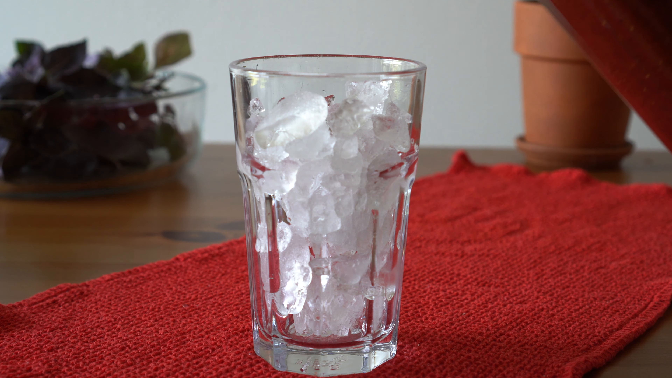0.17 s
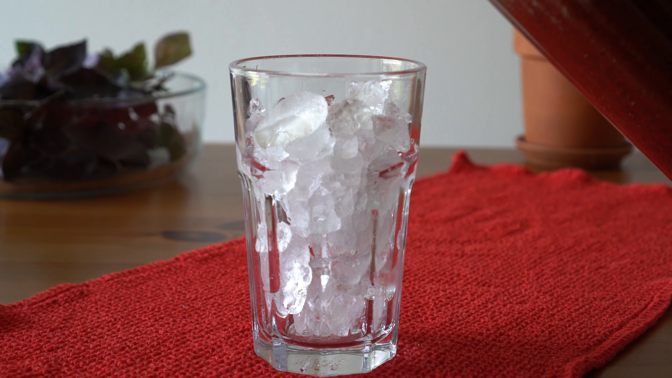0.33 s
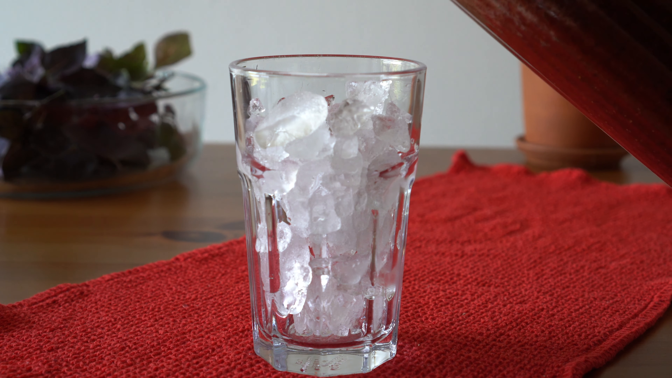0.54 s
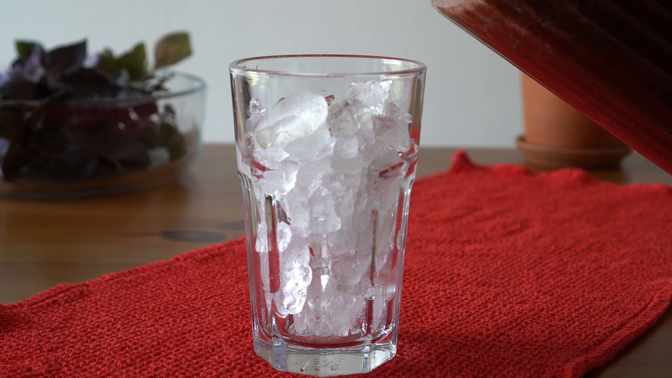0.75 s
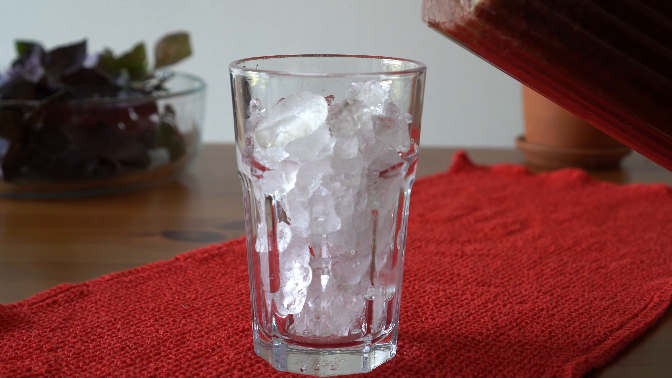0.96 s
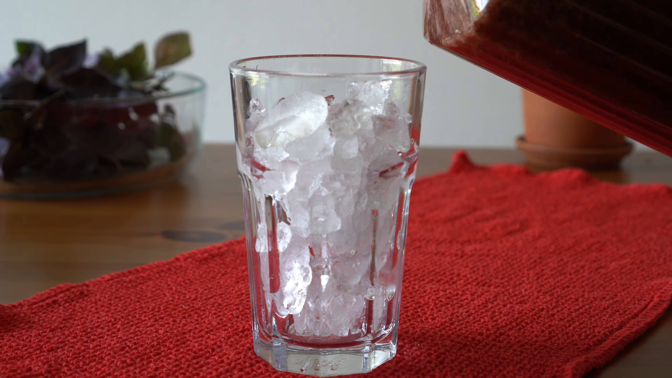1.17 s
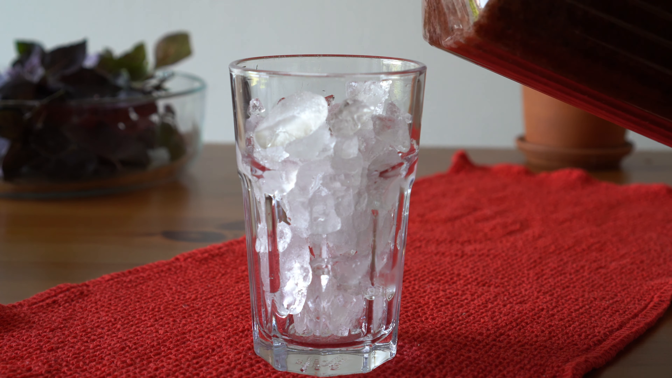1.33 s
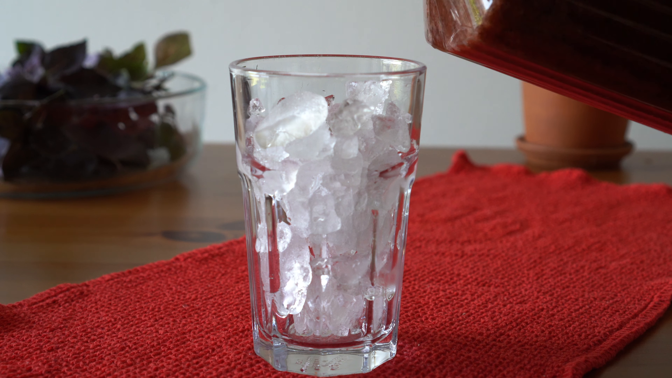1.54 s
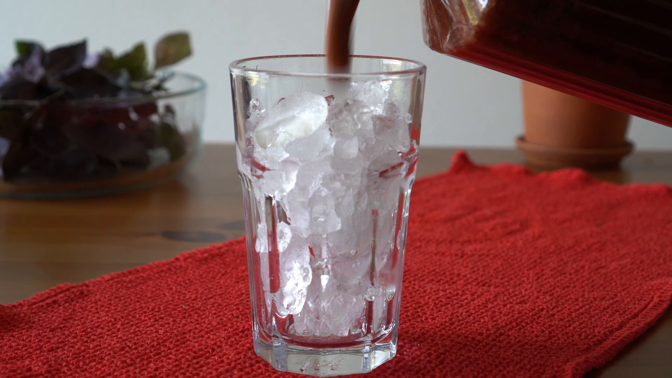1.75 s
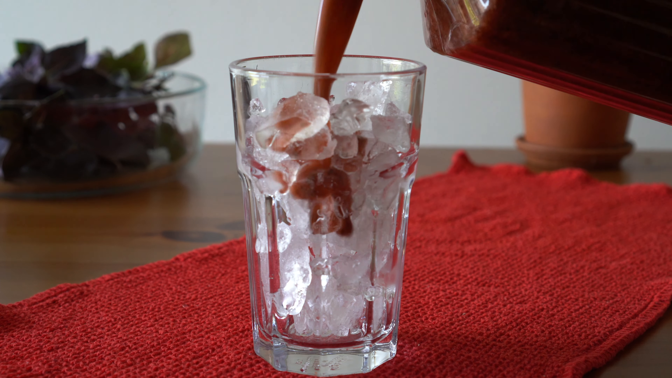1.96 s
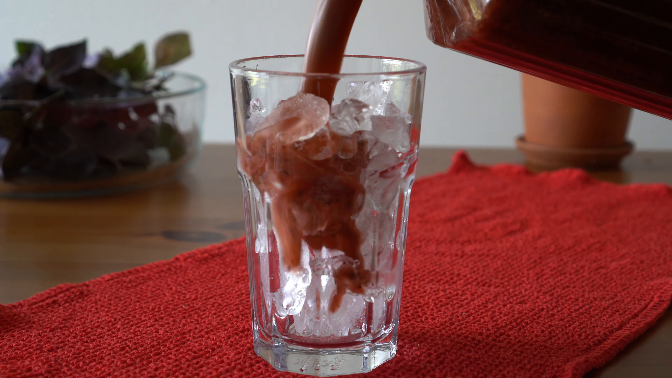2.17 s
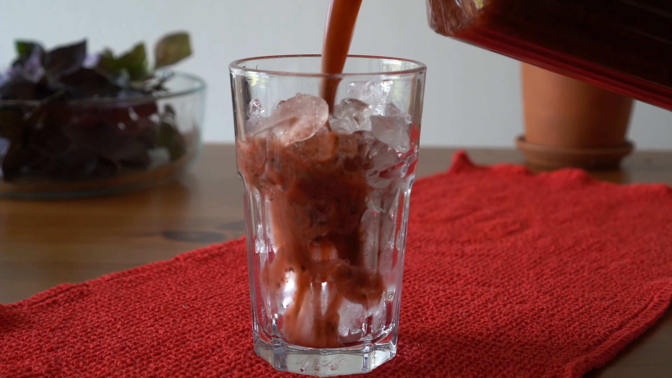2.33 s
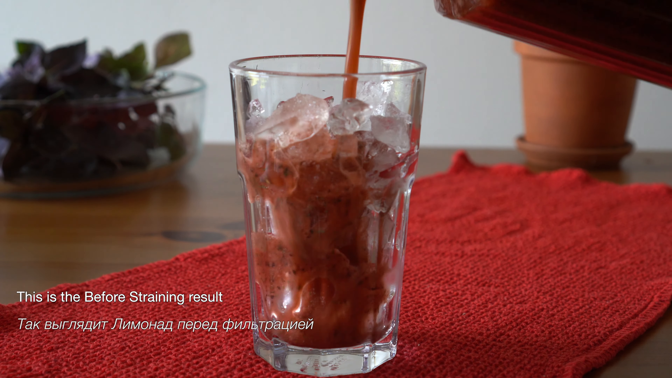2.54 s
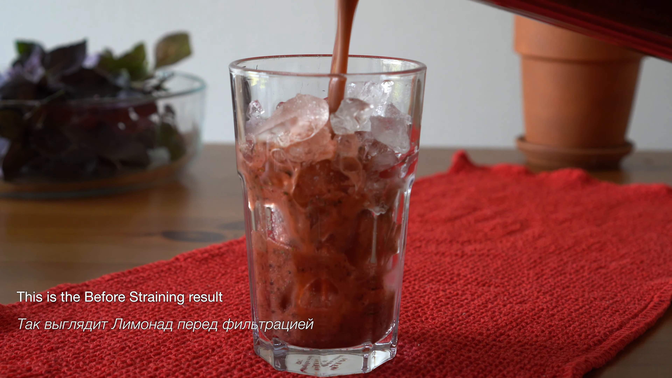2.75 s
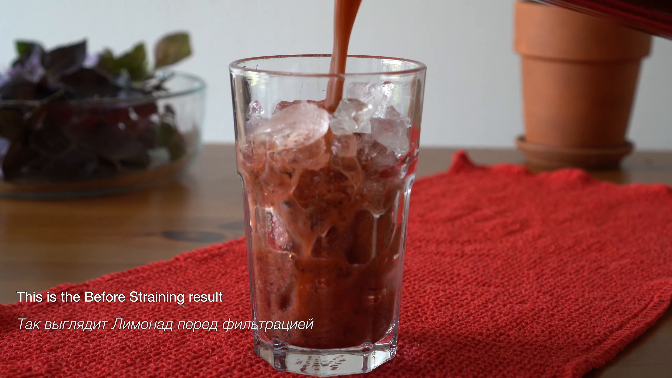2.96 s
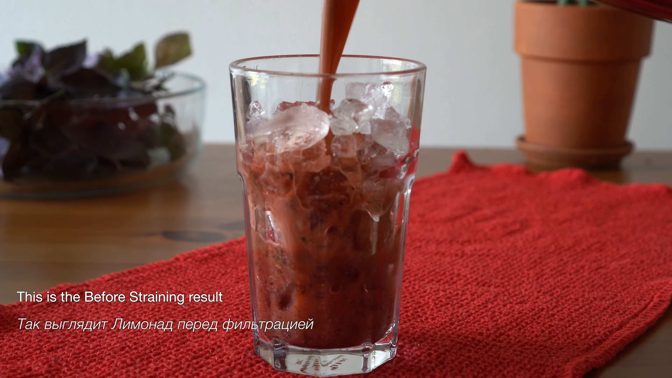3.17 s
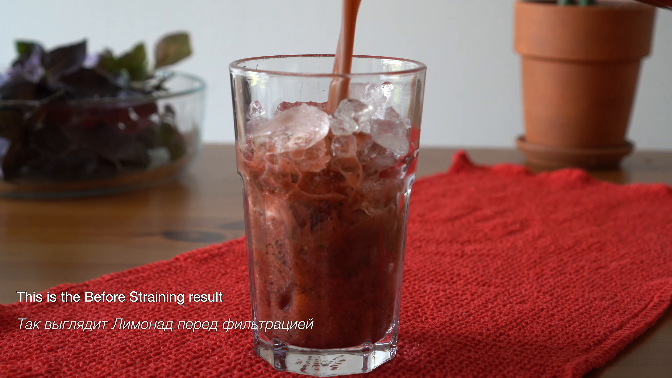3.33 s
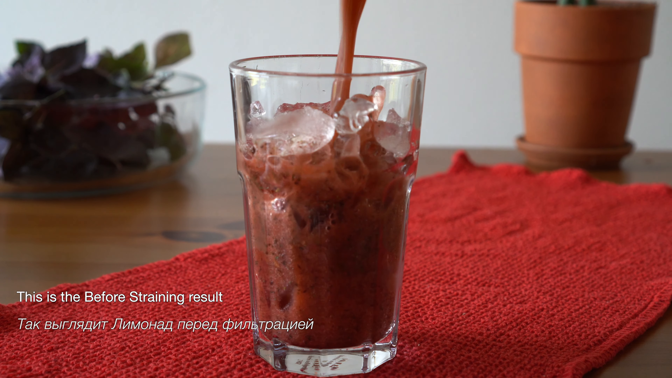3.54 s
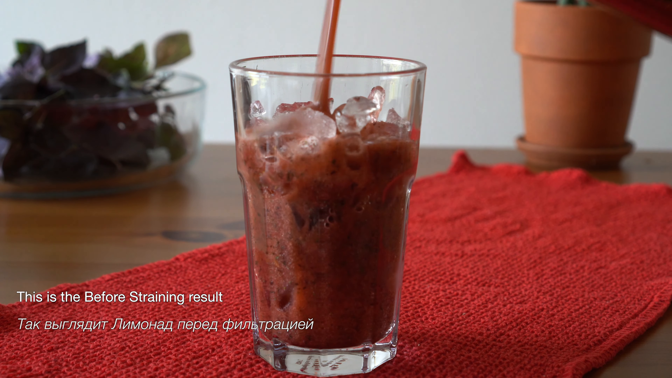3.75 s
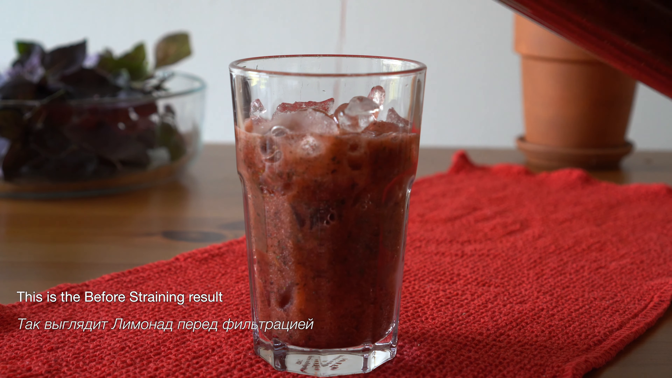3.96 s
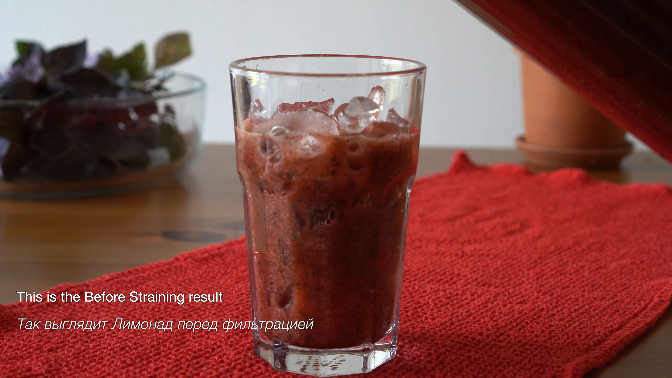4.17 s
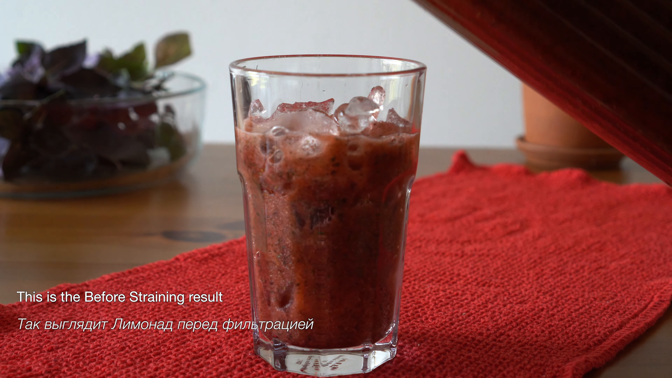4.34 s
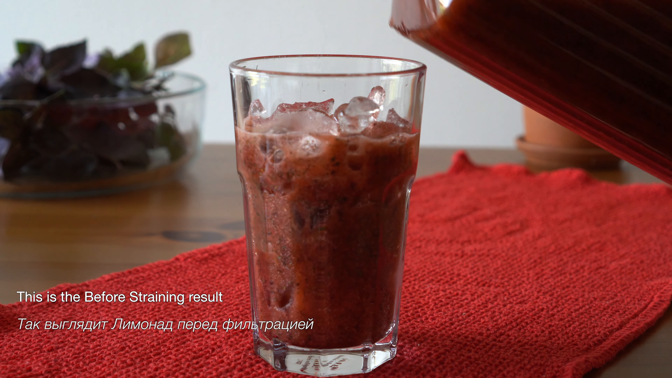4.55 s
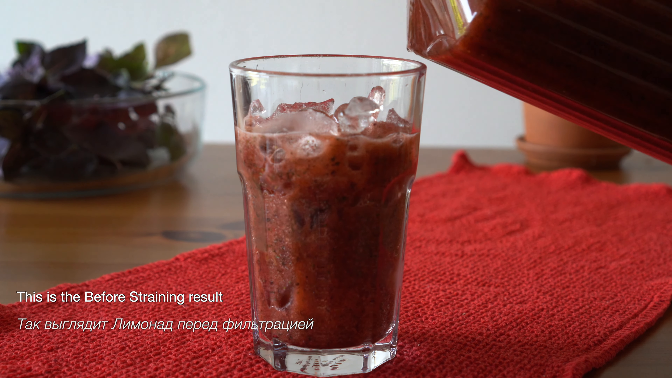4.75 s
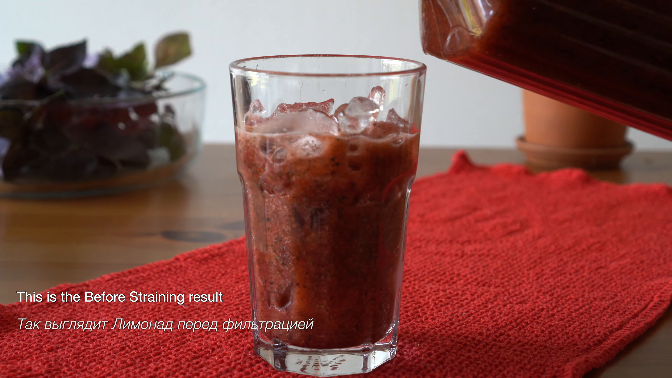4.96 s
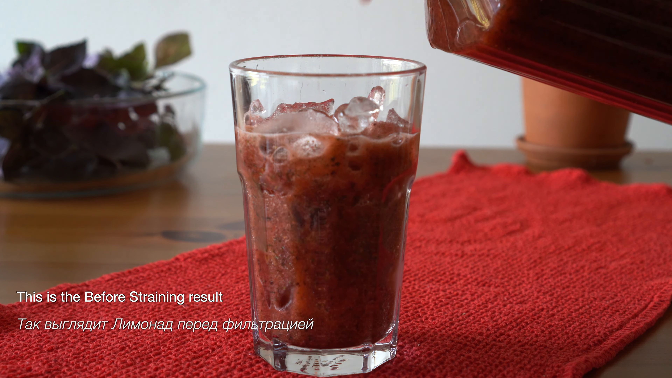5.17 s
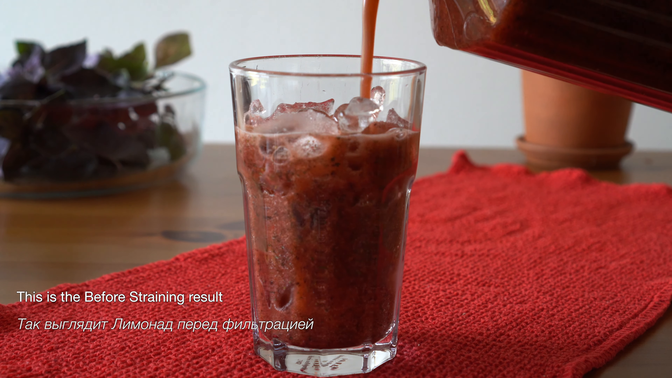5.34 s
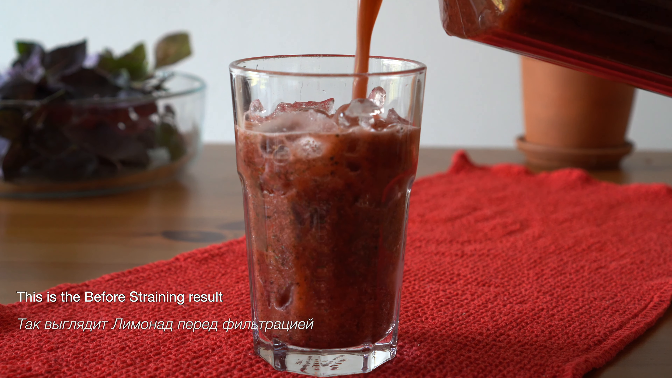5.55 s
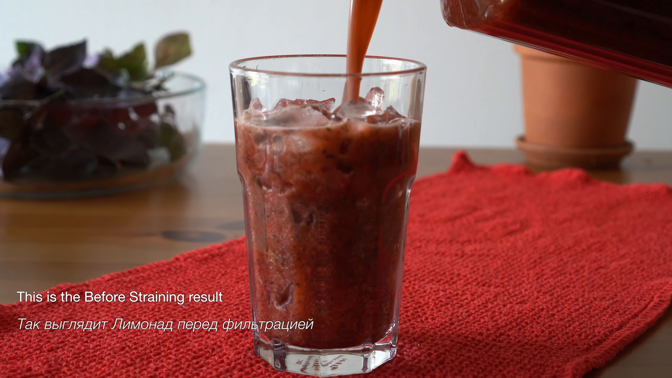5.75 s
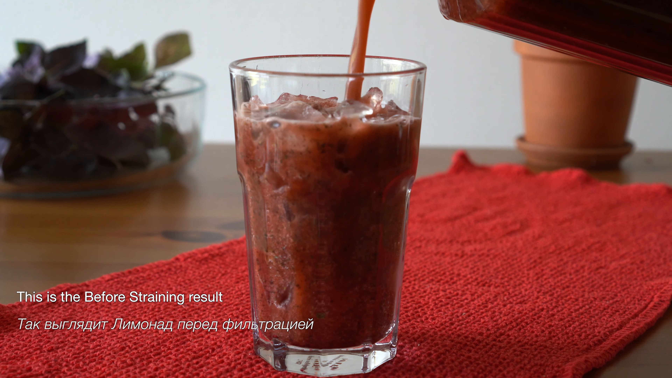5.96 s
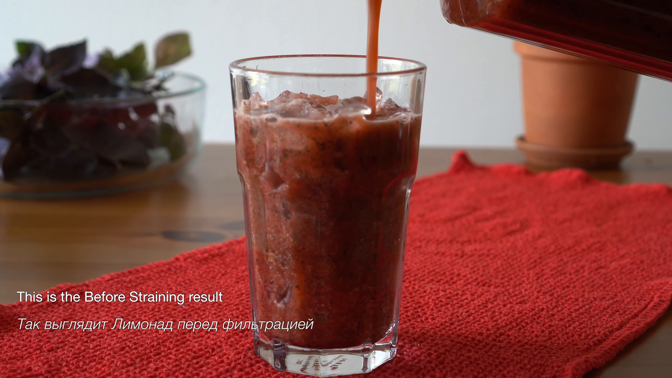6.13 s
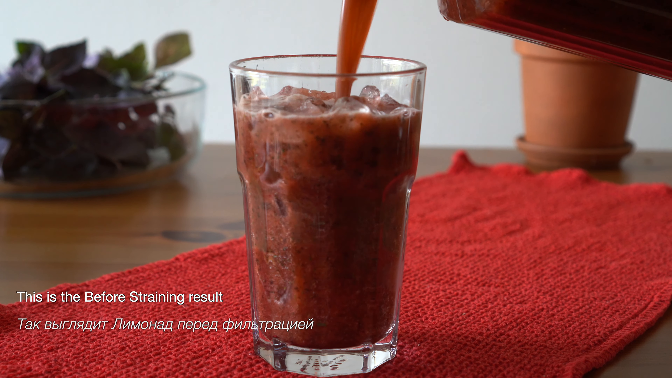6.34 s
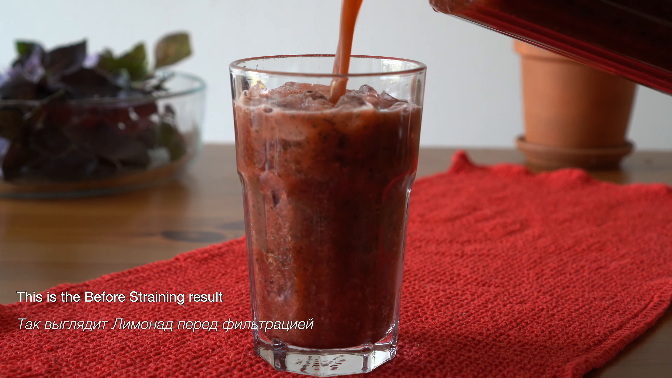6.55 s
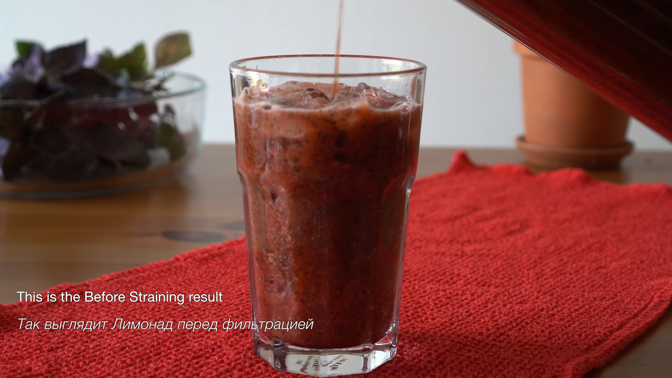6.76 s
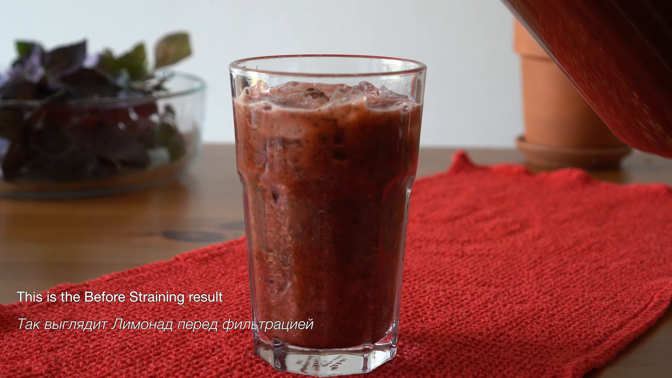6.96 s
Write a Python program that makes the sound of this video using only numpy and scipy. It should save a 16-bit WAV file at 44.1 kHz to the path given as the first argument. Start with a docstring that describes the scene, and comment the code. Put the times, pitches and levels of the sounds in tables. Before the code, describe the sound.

A quiet kitchen with low rumble and faint fan air; the tail of an earlier knock fades, then a soft deep thud. Thick drink pours onto crushed ice in a glass: sharp cracks, wet clacks, glugs and a dense rattle growing loudest around the middle. It dies away to near silence, then a second, much softer pour brings a few clacks and dull glugs. Close microphone, light room reverberation.

```python
"""Thick drink over crushed ice

In a quiet kitchen a thick drink is poured twice over crushed ice in a glass on a padded table.
Ice pieces clack as ringing pairs, crack in spits of bright noise and rattle as grains in resonators.
Trapped air glugs and gurgles; the glass and table knock dully, as damped sines.
Shaped noise makes the fan far off and the building's rumble; one mono microphone hears it with the room."""
import sys
import numpy as np
from scipy import signal
from scipy.fft import rfft, irfft
from scipy.io import wavfile

SR = 44100
rng = np.random.default_rng(int(sys.argv[2]) if len(sys.argv) > 2 else 0)


def wav_record(signal):
    """Record a signal, one row per channel, as 16-bit PCM in the file named by sys.argv[1]."""
    frames = np.transpose(np.atleast_2d(signal))
    bounded = np.clip(frames, -1, 1)
    # unit amplitude maps onto the largest positive 16-bit level
    quanta = np.round(bounded * 32767).astype(np.int16)
    wavfile.write(sys.argv[1], SR, quanta)


N = 308679

# Room air with the fan's broad whines, relative power density: f/Hz, level/dB
AIR = [(88, -35), (150, -2.5), (201, -4.5), (302, -7.5), (346, -15), (381, -9), (540, -15.5), (948, -15.5),
       (1090, -6), (1170, -17), (1600, -11), (2230, -26), (2410, -18), (2650, -27.5), (15500, -43.5)]
AIR_DB = -64   # rms of the air at the microphone
# Rumble of the building: t/s, level/dB
RUMBLE = [(0, -50), (0.9, -53), (1.15, -44.5), (1.9, -51.5), (3.2, -54.5), (4.3, -55), (5.6, -53.5),
          (7.0, -51)]
# Jolts that make the table boom: t/s, level/dB
JOLTS = [(0, -54), (2.0, -52.5), (2.28, -49), (3.02, -47), (3.55, -44), (6.28, -63.5), (6.92, -53)]
BOOM_DB, BOOM_FALL_DB_PER_S = -65.5, 63.5   # low hum of the table at rest; how a jolt dies away
# Decay of the kitchen's reverberation: f/Hz, t60/s
ROOM = [(150, 0.056), (400, 0.43), (1000, 0.32), (2500, 0.49), (6000, 0.35), (9000, 0.42), (13000, 0.22)]
ROOM_DB, ROOM_DELAY_S = -7.5, 0.002
KNOCK_ROOM_DB = 7   # the knocks and the hollow hum send this much more into the room

# Dull knocks of the glass and of the table under it: t/s, level/dB, f/Hz
KNOCKS = [(0.975, -34, 33.2), (1.995, -38.5, 566), (2.001, -41.5, 261), (2.244, -38.5, 485),
          (2.94, -30, 553), (3.003, -38.5, 92), (3.647, -38.5, 408), (4.125, -35, 406.4),
          (4.129, -50.5, 265), (6.813, -49, 397), (6.849, -45, 235), (6.87, -42.5, 425.5)]
# An earlier knock still dying at the start: f/Hz, level/dB, t60/s
EARLIER_KNOCK = [(136.6, -44.5, 0.34), (218.6, -50.5, 0.37), (383, -53, 0.081), (655, -45.5, 0.0078)]
KNOCK_T60_S, KNOCK_T60_SLOPE = 0.12, 0.42   # ring at 400 Hz; lower knocks ring longer by this power of pitch
# Hum of the air in the glass under the first pour: t/s, f/Hz, level/dB
HOLLOW = [(1.84, 620, -64), (1.95, 598, -82), (2.0, 571, -50.5), (2.12, 580.5, -56), (2.22, 593, -66),
          (2.25, 460, -80), (2.56, 451, -77), (2.92, 530, -70), (3.0, 564.4, -41.5), (3.15, 571, -45),
          (3.25, 590, -89)]
HOLLOW_HALF_WIDTH_HZ = 18

# Air glugging out of the gaps: t/s, level/dB, f/Hz
GLUGS = [(1.962, -46, 570), (2.441, -43, 470), (2.592, -42, 450), (2.651, -34.5, 451), (2.74, -39.5, 530),
         (2.779, -29.5, 496), (2.788, -31, 527), (2.83, -40, 508), (5.79, -49, 419), (6.464, -38.5, 663),
         (6.892, -38.5, 425)]
GLUG_CYCLES = 18   # t60 of a glug, in cycles of its pitch
# Gurgles of the drink in a gap, sinking in pitch: t/s, length/s, first f/Hz, last f/Hz, level/dB
GURGLES = [(2.451, 0.3, 1407, 1210, -49.5), (3.161, 0.21, 900, 876, -45), (3.293, 0.14, 2750, 2447, -42),
           (4.013, 0.0697, 1700, 1472, -46), (6.82, 0.044, 2440, 2370, -63.5)]
GURGLE_HALF_WIDTH_HZ, GURGLE_FALL_DB_PER_S, PLOPS_PER_S = 150, 404, 500

# Stir of the stream under the slips, and the pitch around which the gaps favour sound as they fill:
# t/s, rattle level/dB, crackle level/dB, reference f/Hz
STREAM = [(1.848, -73, -75, 2600), (2.12, -76, -67, 2740), (2.36, -44.5, -59, 2800),
          (2.46, -53.5, -51, 1550), (2.7, -62, -79, 1390), (2.9, -44, -54.5, 1730), (3.05, -46, -60, 1850),
          (3.2, -38.5, -44, 1205), (3.3, -40.5, -50.5, 1399), (3.4, -41.5, -46.5, 1810),
          (3.66, -36, -45.5, 1975), (3.8, -45.5, -49.5, 1628), (3.97, -67, -61, 2159),
          (4.2, -92.5, -103.5, 1394), (5.75, -75.5, -74, 1527), (5.95, -91.5, -100.5, 1290),
          (6.37, -71.5, -81.5, 1700), (6.44, -63, -66, 2073), (6.6, -68.5, -72.5, 1424),
          (6.8, -76, -93.5, 2600)]
# Slips of the heap of ice: t/s of full strength, rattle level/dB, crackle level/dB, hold/s
SLIDES = [(1.855, -47, -48, 0.0036), (1.901, -50, -48, 0.0075), (1.99, -35.5, -38.5, 0.0054),
          (2.14, -40, -50, 0.026), (2.192, -40, -48.5, 0.025), (2.25, -33, -39, 0.011),
          (2.331, -57, -48.5, 0.017), (2.443, -69, -60, 0.086), (2.558, -55, -50, 0.022),
          (2.654, -49, -51, 0.011), (2.78, -37.5, -48, 0.015), (2.942, -24, -34.5, 0.0083),
          (3.013, -25, -42.5, 0.048), (3.104, -38, -43.5, 0.014), (3.305, -35, -67, 0.042),
          (3.506, -25, -29, 0.027), (3.556, -26, -34, 0.014), (3.761, -36.5, -59, 0.0089),
          (4, -49.5, -60, 0.018), (5.762, -57.5, -83.5, 0.02), (5.831, -47, -76, 0.062),
          (6.317, -63.5, -67, 0.041), (6.388, -39.5, -68, 0.005), (6.419, -38, -57, 0.015),
          (6.835, -57.5, -71.5, 0.028)]
SLIDE_RISE_DB_PER_S, RATTLE_FALL_DB_PER_S, CRACKLE_FALL_DB_PER_S = 1700, 203, 295.5
TOUCHES_PER_S, CRACKLES_PER_S = 3200, 1800
DULL_ABOVE_HZ = 3650   # wet pieces rattle little above this pitch

# Small cracks in the ice: t/s, reference level/dB (each part is set against it), f/Hz
CRACKS = [(1.8531, -19.5, 8750), (2.004, -13.5, 5300), (2.0144, -17.5, 5550), (2.145, -29.5, 7800),
          (2.248, -19, 5350), (2.414, -27.5, 7300), (2.439, -39, 8400), (2.5995, -26.5, 7100),
          (2.6677, -13.5, 5180), (2.7643, -33.5, 8050), (2.845, -23, 8500), (2.9786, -5, 4370),
          (3.0178, -7, 4370), (3.212, -12.5, 5940), (3.295, -21.5, 12960), (3.36, -12, 5540),
          (3.3705, -14.5, 8700), (3.3912, -17.5, 8150), (3.4297, -20.5, 7850), (3.5051, -8, 4500),
          (3.5177, -12, 4430), (3.536, 0, 4470), (3.638, -17.5, 5730), (3.7153, -22, 7800),
          (3.7715, -17.5, 8400), (3.792, -14, 7500), (3.833, -21, 7040), (3.8914, -17.5, 6530),
          (3.931, -23.5, 12200), (3.996, -19.5, 8470), (4.013, -14.5, 9100), (4.0302, -20, 8500),
          (4.085, -26.5, 9400), (4.16, -22.5, 6170), (4.463, -43.5, 8250), (4.757, -38, 5380),
          (5.492, -44.5, 3500), (5.547, -39, 4540), (5.673, -52.5, 8100), (5.6995, -36, 6000),
          (6.053, -47, 5000), (6.326, -44, 5630), (6.3857, -26.5, 4950), (6.416, -17.5, 4800),
          (6.5105, -32, 5100), (6.71, -38, 4000)]
CRACK_CYCLES = 7   # t60 of the ring, in cycles of its pitch
SNAP_DB, SNAP_HZ = -8, 10000   # the brightest edge of a crack, before its weight by pitch
# Ice pieces striking: t/s, reference level/dB (each part is set against it), f/Hz
CLACKS = [(1.8584, -27, 2800), (1.9072, -28.5, 2280), (2.003, -17, 2270), (2.0152, -25, 2350),
          (2.048, -26.5, 3450), (2.147, -21, 3050), (2.166, -24, 2940), (2.194, -23, 2380),
          (2.2425, -20.5, 1780), (2.356, -22.5, 1930), (2.4149, -18, 3080), (2.44, -23.5, 1610),
          (2.4536, -24, 1405), (2.5083, -23, 2320), (2.537, -31, 1340), (2.556, -25, 1440),
          (2.558, -22.5, 2970), (2.572, -28, 2330), (2.6223, -29, 1240), (2.6569, -27.5, 1340),
          (2.6673, -20.5, 1770), (2.674, -21, 1375), (2.7405, -30, 1720), (2.7822, -13.5, 1930),
          (2.796, -25.5, 1350), (2.814, -24.5, 2050), (2.825, -29, 1180), (2.844, -19.5, 1520),
          (2.8647, -21.5, 1500), (2.9353, -17, 1440), (2.9397, -7.5, 1570), (2.953, -9, 1480),
          (3.006, -2.5, 1890), (3.018, -6.5, 1970), (3.0411, -8, 3320), (3.12, -11.5, 2030),
          (3.1459, -9.5, 930), (3.1474, -7, 1890), (3.207, -13.5, 1013), (3.2448, -15.5, 1710),
          (3.2956, -7, 2490), (3.352, -14, 2150), (3.4146, -14, 1390), (3.4199, -14, 1530),
          (3.4469, -14.5, 2410), (3.466, -15, 1840), (3.483, -14, 1540), (3.498, -10, 1620),
          (3.507, -16, 2640), (3.5158, -8.5, 2450), (3.522, -10.5, 2107), (3.5371, -13, 1563),
          (3.5781, -9, 2470), (3.635, -21, 3270), (3.6479, -14.5, 1034), (3.769, -16.5, 1560),
          (3.83, -28, 3300), (3.985, -32, 3170), (3.998, -27, 2900), (4.0118, -23, 1430),
          (4.032, -17, 1620), (5.49, -43, 1440), (5.793, -48, 897), (5.8266, -32.5, 1340),
          (5.829, -35.5, 1900), (5.844, -38, 1340), (5.8704, -24.5, 974), (5.8699, -26.5, 2060),
          (5.921, -34, 834), (5.981, -44, 2940), (6.3856, -19.5, 2900), (6.3988, -23.5, 2080),
          (6.417, -22.5, 3120), (6.4256, -26.5, 1180), (6.457, -30, 1340), (6.639, -44.5, 826),
          (6.799, -44, 2010), (6.814, -48, 2250), (6.8279, -28.5, 2220), (6.8446, -35, 1000)]
TICK_UNDER_DB = 17   # the tick peaks this far under the reference level

MIC_PEAK_HZ, MIC_PEAK_WIDTH_HZ = 8250, 4730   # the capsule lifts a little here and falls above
CUTOFF_HZ = 16000


def from_db(db):
    """Level in dB to amplitude."""
    return 10 ** (np.asarray(db) / 20)


def rms_one(x):
    """Scales a signal to rms 1."""
    return x / np.sqrt(np.mean(x ** 2) + 1e-20)


def in_time(rows):
    """Draws each column after the first as a curve through the times in the first."""
    s, *columns = np.transpose(rows)
    return [np.interp(np.arange(N) / SR, s, c) for c in columns]


def at_hz(points, hz):
    """Reads a table at a frequency, straight between points on a log frequency axis."""
    table_hz, values = np.transpose(points)
    return np.interp(np.log(hz), np.log(table_hz), values)


def band(x, low_hz, high_hz):
    """Passes what lies between two frequencies."""
    edges = [low_hz, min(high_hz, .45 * SR)]
    return signal.sosfilt(signal.butter(2, edges, "band", fs=SR, output="sos"), x)


def ring(x, hz, t60):
    """A unit click sets a damped sine of starting height 1 ringing."""
    r, w = from_db(-60 / (t60 * SR)), 2 * np.pi * hz / SR
    return signal.lfilter([0, np.sin(w)], [1, -2 * r * np.cos(w), r * r], x + 1e-18)


def add(out, s, sound):
    """Mixes a short sound in at a time."""
    i = max(round(s * SR), 0)
    out[i:i + len(sound)] += sound[:N - i]


def burst(hz, t60, rise_s):
    """A damped sine with a rounded start, peak 1."""
    t = np.arange(round(t60 * SR) + 16) / SR
    rise = 1 - np.exp(-(t / rise_s) ** 2)
    wave = np.sin(2 * np.pi * hz * t) * from_db(-60 * t / t60) * rise
    return wave / np.abs(wave).max()


def swells(times, dbs, holds, rise_db_per_s, fall_db_per_s):
    """Power sum of envelopes that rise, hold and fall; as gain."""
    t = np.arange(0, N + 32, 32) / SR
    s, db, hold = (np.array(v)[:, None] for v in (times, dbs, np.maximum(holds, 0)))
    before, after = np.maximum(s - t, 0), np.maximum(t - s - hold, 0)
    shape_db = db - rise_db_per_s * before - fall_db_per_s * after
    gain = np.sqrt(np.sum(from_db(2 * shape_db), axis=0))
    return np.interp(np.arange(N) / SR, t, gain)


def narrow(hz, half_width_hz, per_s=SR):
    """Random kicks, so many a second, ring in a narrow band around a moving pitch; rms 1."""
    white = rng.standard_normal(N) + 1j * rng.standard_normal(N)
    kicks = white * (rng.random(N) < per_s / SR) + 1e-18
    sway = signal.sosfilt(signal.butter(2, half_width_hz, fs=SR, output="sos"), kicks)
    carrier = np.exp(2j * np.pi * np.cumsum(hz) / SR)
    return rms_one((sway * carrier).real)


def grains(per_s, spread_db, pitches, cycles, gain):
    """Random touches of uneven size, dealt to short resonators; gain(hz) weighs each pitch; rms 1."""
    sizes = from_db(spread_db * np.minimum(rng.exponential(1, N), 3.2)) * rng.choice([-1, 1], N)
    born = rng.random(N) < per_s / SR
    dealt = rng.integers(0, len(pitches), N)
    out = 0
    for k, hz in enumerate(pitches):
        # wet contact swells over a cycle
        soft = ring(sizes * born * (dealt == k), hz, 2.3 / hz) * hz / 3000
        out = out + gain(hz) * ring(soft, hz, cycles / hz)
    return rms_one(out)


def background():
    """Smooth room air with a fan's broad whines, a low rumble, and the table's boom, all shaped noise."""
    hz = np.maximum(np.arange(N // 2 + 1) * SR / N, 1)
    air = rms_one(irfft(rfft(rng.standard_normal(N)) * from_db(at_hz(AIR, hz)), N))
    white = rng.standard_normal((2, N))
    rumble_db, = in_time(RUMBLE)
    rumble = from_db(rumble_db) * rms_one(band(band(white[0], 20, 41.5), 15, 60))
    s, db = np.transpose(JOLTS)
    shaken = np.hypot(from_db(BOOM_DB), swells(s, db, 0 * s, 150, BOOM_FALL_DB_PER_S))
    table = rms_one(band(white[1], 85, 125)) + 1.2 * rms_one(ring(white[1], 139, 0.17))
    boom = shaken * rms_one(table)
    return from_db(AIR_DB) * air + rumble + boom


def kitchen(x):
    """A noise tail dying band by band; a band's energy grows with its pitch and decay time."""
    t, tail = np.arange(round(.7 * SR)) / SR, 0
    for low in 100 * 2 ** np.arange(0, 7.3, 1 / 6):
        t60 = at_hz(ROOM, low)
        noise = band(rng.standard_normal(len(t)), low / 2 ** (1 / 8), low * 2 ** (1 / 4))
        dying = noise * from_db(-60 * t / t60)
        tail = tail + rms_one(dying) * np.sqrt(low * t60) * (t > ROOM_DELAY_S)
    unit_tail = tail / np.sqrt(np.sum(tail ** 2))
    return from_db(ROOM_DB) * signal.fftconvolve(x, unit_tail)[:N]


def knocks():
    """Each knock rings as a close pair of damped sines, the upper one weaker and shorter."""
    out = np.zeros(N)
    rows = [(s, db, hz, KNOCK_T60_S * (400 / hz) ** KNOCK_T60_SLOPE) for s, db, hz in KNOCKS]
    rows += [(0, db, hz, t60) for hz, db, t60 in EARLIER_KNOCK]
    for s, db, hz, t60 in rows:
        add(out, s, from_db(db) * burst(hz, t60, 0.87 / hz))
        add(out, s, from_db(db - 10.0) * burst(1.095 * hz, t60 / 2, 0.19 / hz))
    return out


def hollow():
    """Narrow noise around the pitch of the air space in the glass, stirred by the stream."""
    hz, db = in_time(HOLLOW)
    t = np.arange(N) / SR
    during = (t > HOLLOW[0][0]) * (t < HOLLOW[-1][0])
    return from_db(db) * narrow(hz, HOLLOW_HALF_WIDTH_HZ) * during


def settling():
    """Faint stray ticks while the ice warms: sparse grains in high resonators."""
    ticks = grains(40, 4.5, np.geomspace(4000, 11000, 6), 4.0, lambda hz: 1)
    return from_db(-85.0) * ticks * (np.arange(N) > 4.2 * SR)


def glugs():
    """Each pocket of air rings low and briefly, as a damped sine."""
    out = np.zeros(N)
    for s, db, hz in GLUGS:
        add(out, s, from_db(db) * burst(hz, GLUG_CYCLES / hz, 1.8 / hz))
    return out


def gurgles():
    """Each gurgle is a run of small plops: it starts almost at once, holds while it sinks, and fades."""
    out = 0
    for s, length, first, last, db in GURGLES:
        hz, = in_time([(s, first), (s + length, last)])
        shape = swells([s], [db], [length], 10 * GURGLE_FALL_DB_PER_S, GURGLE_FALL_DB_PER_S)
        out = out + shape * narrow(hz, GURGLE_HALF_WIDTH_HZ, PLOPS_PER_S)
    return out


def rattle():
    """Many unseen touches between the pieces, and a fine crackle above them, as grains in resonators."""
    stir_db, fizz_db, reference_hz = in_time(STREAM)
    s, slip_db, crackle_db, hold = np.transpose(SLIDES)

    def near(hz):
        """The gaps favour a pitch 0.24 octave under the reference: steep below it, a long skirt above."""
        octaves = np.log2(hz / reference_hz) + 0.24
        below_db = np.maximum(-30.0 * octaves ** 2, -26)
        skirt_db = np.where(octaves < 0, below_db, -4.5 * octaves)
        crest_db = 1.9 * np.exp(-(octaves / 0.16) ** 2)
        dull_db = 100.0 * max(np.log2(hz / DULL_ABOVE_HZ), 0)
        return from_db(skirt_db + crest_db - dull_db)

    body = grains(TOUCHES_PER_S, 5.13, np.geomspace(400, 4200, 20), 12.7, near)
    fine = grains(CRACKLES_PER_S, 3.5, np.geomspace(4300, 15000, 11), 5.3, lambda hz: (5000 / hz) ** 2.7)
    poured = np.arange(N) / SR > STREAM[0][0]
    slips = swells(s, slip_db, hold, SLIDE_RISE_DB_PER_S, RATTLE_FALL_DB_PER_S)
    crackles = swells(s, crackle_db, hold, SLIDE_RISE_DB_PER_S, CRACKLE_FALL_DB_PER_S)
    loud = np.hypot(from_db(stir_db), slips)
    bright = np.hypot(from_db(fizz_db), crackles)
    return poured * (loud * body + bright * fine)


def cracks():
    """Tiny splits: a short high ring inside a spit of bright noise, with a brighter edge."""
    out, spit = np.zeros(N), rng.standard_normal((len(CRACKS), 400))
    t = np.arange(400) / SR
    fade = from_db(-60 * t / 0.011) * (1 - np.exp(-t / 0.0013))
    for (s, db, hz), noise in zip(CRACKS, spit):
        add(out, s, from_db(db - 11) * burst(hz, CRACK_CYCLES / hz, 0.0014))
        add(out, s, from_db(db - 3.5) * band(noise * fade, 0.44 * hz, 1.253 * hz))
        # higher cracks have the stronger edge
        edge = (hz / SNAP_HZ) ** 2 * band(noise * fade, SNAP_HZ, 14000)
        add(out, s, from_db(db + SNAP_DB) * edge)
    return out


def clacks():
    """Each blow rings at the pitch of the piece and of a close neighbour, with a broad wet tick as its edge."""
    out, chance = np.zeros(N), rng.random((len(CLACKS), 2))
    spit = rng.standard_normal((len(CLACKS), 300))
    for (s, db, hz), (close, ring_on), noise in zip(CLACKS, chance, spit):
        t60 = (4.5 + 7.0 * ring_on) / hz
        cycles = np.arange(300) * hz / SR
        fade = from_db(-12 * cycles) * (1 - np.exp(-cycles))
        tick = band(noise * fade, .7 * hz, 2.6 * hz)
        neighbour = burst(hz * (0.82 + 0.4 * close), 2.3 * t60, 6.1 / hz)
        add(out, s, from_db(db - 2.0) * burst(hz, t60, 0.9 / hz))
        add(out, s, from_db(db - TICK_UNDER_DB) * tick / np.abs(tick).max())
        add(out, s + 0.00092, from_db(db - 14.0) * neighbour)   # answers just after
    return out


def scene():
    """Sums the direct sound, the room's answer and the background, alike in both channels."""
    thuds = knocks() + hollow()
    ice = settling() + glugs() + gurgles() + rattle() + cracks() + clacks()
    room = kitchen(ice + from_db(KNOCK_ROOM_DB) * thuds)
    mono = background() + room + thuds + ice
    return np.array([mono, mono])


def record(dry):
    """A resonant capsule that falls off above its peak, amplifier hiss, and a steep cut of the top."""
    r, w = np.exp(-np.pi * MIC_PEAK_WIDTH_HZ / SR), 2 * np.pi * MIC_PEAK_HZ / SR
    poles = [1, -2 * r * np.cos(w), r * r]
    capsule = signal.lfilter([sum(poles)], poles, dry)
    hiss = from_db(-77.5) * rng.standard_normal(N)
    return signal.sosfilt(signal.ellip(12, .5, 90, CUTOFF_HZ, fs=SR, output="sos"), capsule + hiss)


dry = scene()
out = record(dry)
wav_record(out)
```